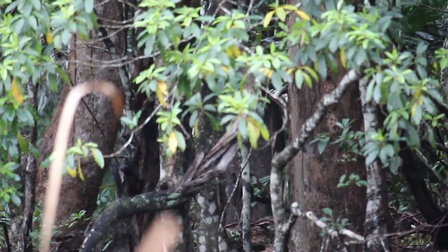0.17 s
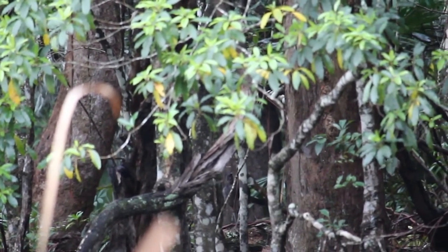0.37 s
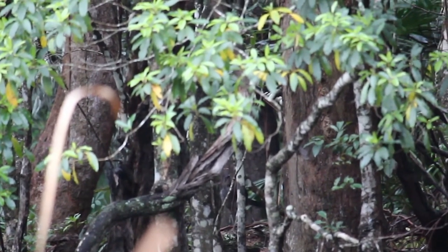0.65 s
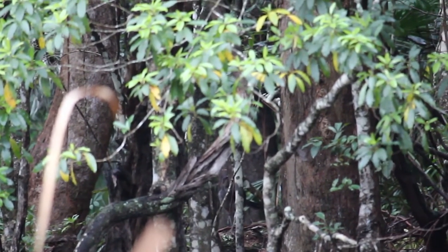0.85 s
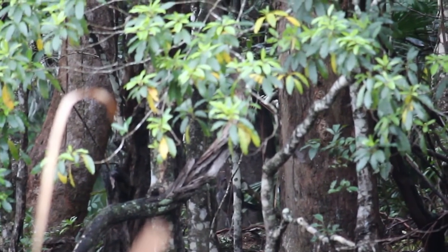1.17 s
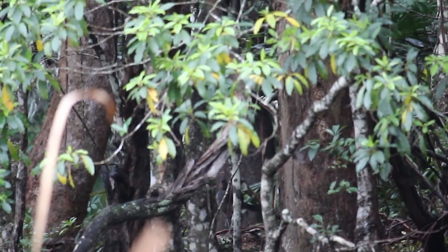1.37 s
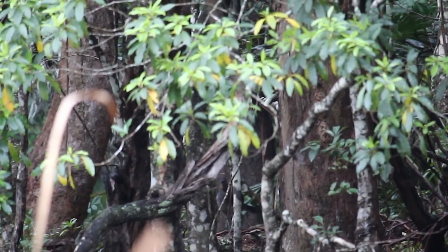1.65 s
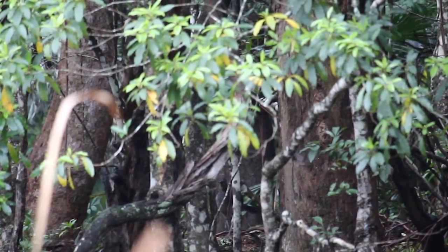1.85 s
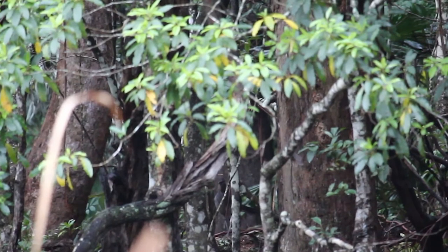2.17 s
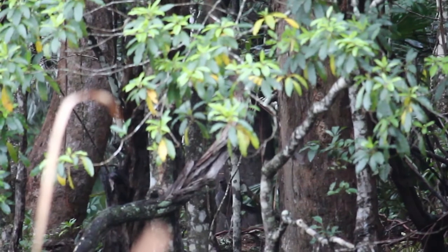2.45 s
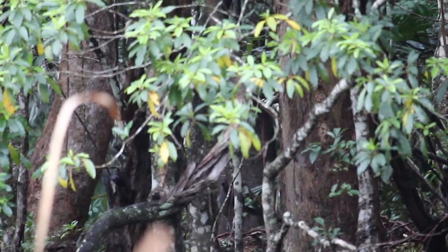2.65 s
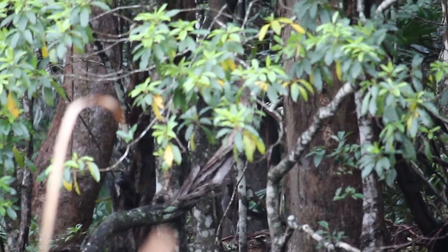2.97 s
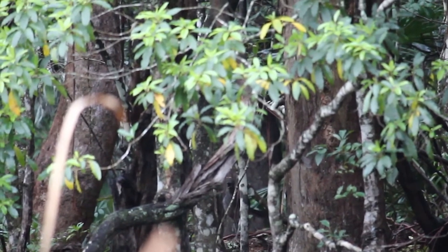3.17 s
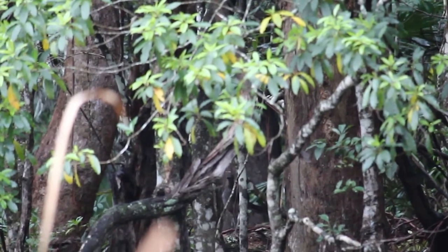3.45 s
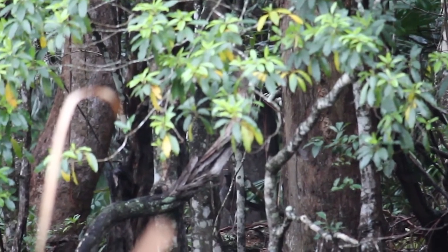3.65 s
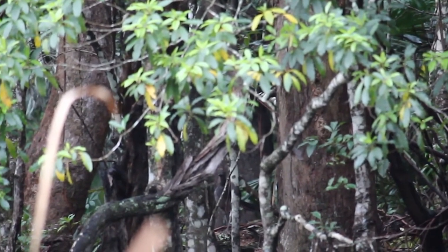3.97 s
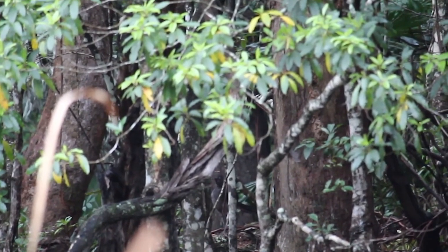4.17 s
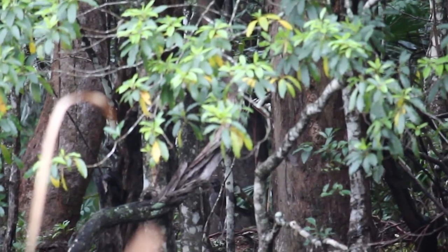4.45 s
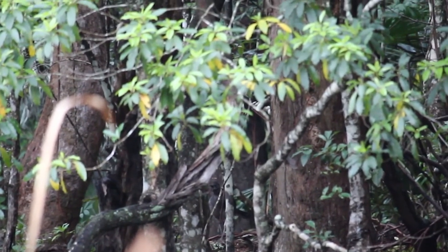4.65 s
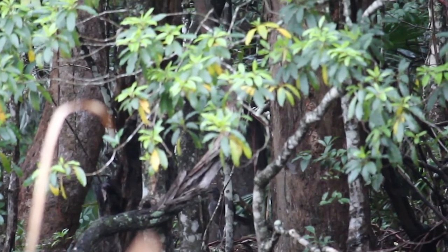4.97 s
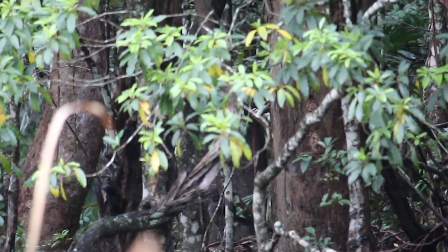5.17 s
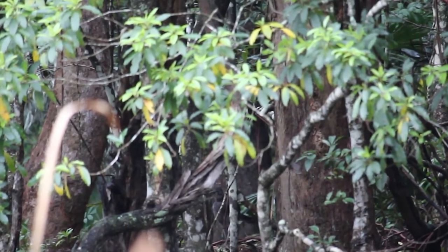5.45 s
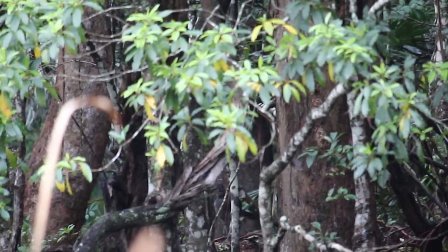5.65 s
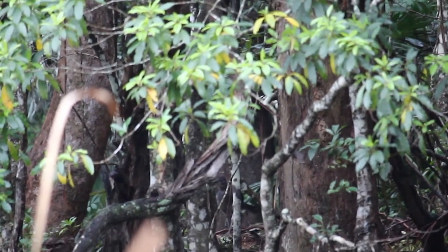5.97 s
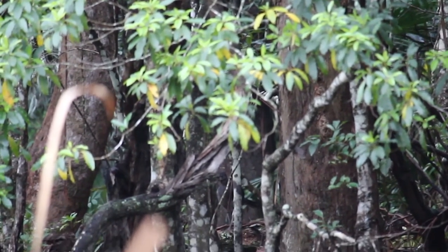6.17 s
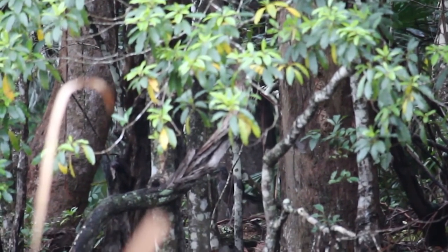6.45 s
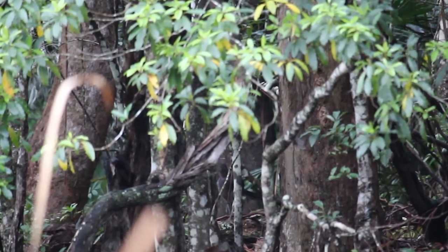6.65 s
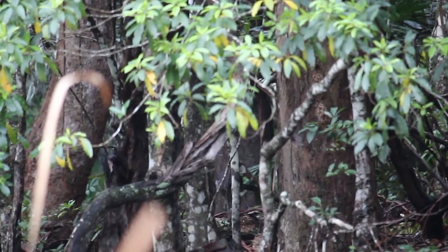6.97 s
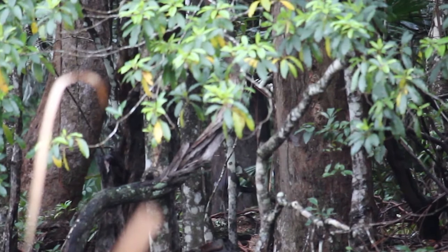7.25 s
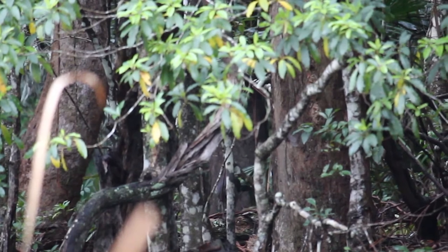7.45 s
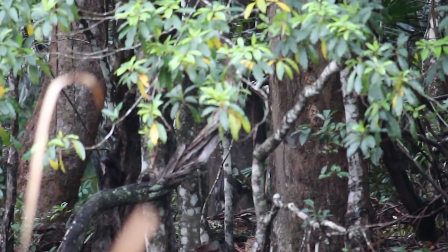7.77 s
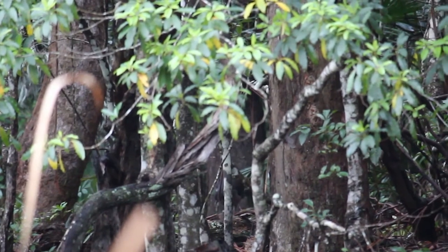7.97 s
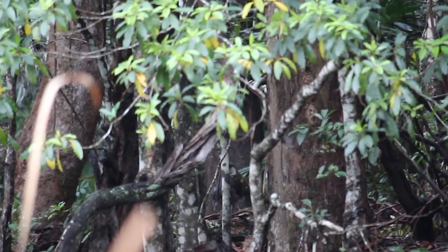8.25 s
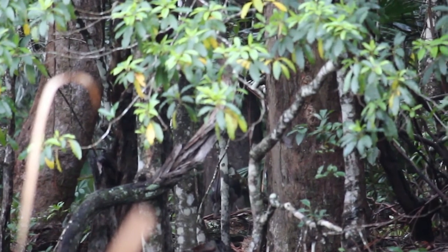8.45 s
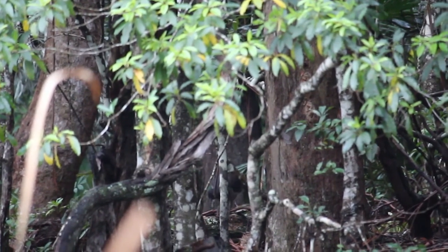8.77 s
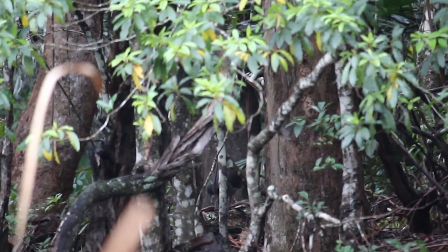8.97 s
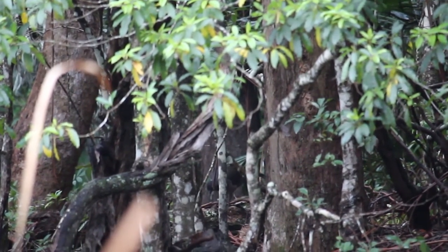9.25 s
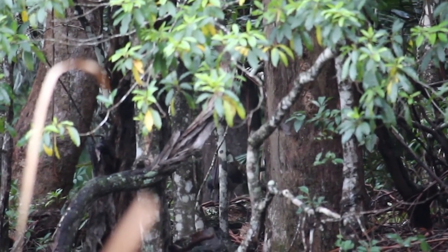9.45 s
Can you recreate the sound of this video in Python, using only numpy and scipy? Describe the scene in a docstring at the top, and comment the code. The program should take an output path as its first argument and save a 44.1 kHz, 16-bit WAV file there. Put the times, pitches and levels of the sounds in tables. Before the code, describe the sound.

A steady soft wash of wet-forest air with a faint low drone and scattered drips runs throughout. At 0-0.65 s a lyrebird gives short, quiet dry rasps; a drip thuds at 0.5, the camera creaks in tiny slips at 0.9, a drop ticks at 1.3, and small birds pip at 0.9 and 1.5. Whip whistles near 2.0, 2.7 and 3.3 s swell around 2.3 kHz, then snap above 3 kHz, with slurs and hoarse snarls at 2.5 and 3.3. A yelp breaks downward at 3.5-3.7. A long rasp surges from 4.3 to 5.0; a rattling squawk comes at 5.4-5.9, then quick upward chirps and a final whip at 6.3. Forest echoes trail away. After 7 s: faint hisses, weak low rasps, a chirp at 7.9, a breathy snarl at 8.2, light low wind, soft bumps at 8.7-9.2, sharp drips at 8.6 and 9.2-9.3, and a tiny falling whistle at 9.4.

```python
"""Lyrebird in a wet forest

A lyrebird sings whip whistles that swoop up and break, slurs, a yelp that breaks downward, snarls and dry rasps.
Tones are sine stacks with wavering pitch; rasps are puffs of noise through throat resonances, plus single pulses.
Small birds pip as single sines; drips, a camera creak and late soft bumps are struck resonances.
Scattered noise taps stretch the calls into a forest tail, over filtered-noise air, a faint drone and light wind."""
import sys
import numpy as np
from scipy import signal
from scipy.fft import rfft, irfft
from scipy.io import wavfile
from scipy.ndimage import uniform_filter1d, map_coordinates

SR = 44100
rng = np.random.default_rng(int(sys.argv[2]) if len(sys.argv) > 2 else 0)


def transcribe(u):
    """Save the signal u as a 16-bit wav file named by the first command-line argument.

    u: samples, shape (n,) or (channels, n), limited to [-1, 1]; the rate is SR.
    q: integer samples, one column per channel.
    """
    v = np.clip(np.atleast_2d(u).T, -1, 1)
    q = np.round(v * 32767).astype(np.int16)
    wavfile.write(sys.argv[1], SR, q)


N = 423360
EDGE_HZ = 15750  # top of the band

# Wash of the forest, common part and left-right difference: (frequency [Hz], relative density [dB])
AIR_MID_COLOUR = [(20, -43), (40, 4), (174, 0), (670, -7.5), (880, -5.5), (1600, -9.5), (3140, -8),
                  (4920, -13.5), (15500, -28.5)]
AIR_SIDE_COLOUR = [(35, -13.5), (179, -7.5), (1190, -13), (7160, -21.5), (15500, -36)]
AIR_MID_DB, AIR_SIDE_DB = -51.5, -52

# Far tail among the trunks: (frequency [Hz], decay by 60 dB [s])
FOREST_DECAY = [(300, 8.9), (1000, 1.33), (2500, 1.33), (4000, 1.62), (7000, 0.77), (14000, 0.31)]

# Short rasps: (start [s], length [s], crest as share of length, crest effort [dB], flutter setting [Hz],
# mouth factor on resonances, slack factor on widths, chest boost [dB], brightness [dB])
SHORT_RASPS = [ (0, .13, 0.26, -51, 120, 1.06, 1.4, -12, 8.5),
               (0.132, 0.073, 0.65, -49.5, 120, 1.08, 1.46, -0.5, 6.5),
               (0.358, 0.14, 0.84, -55, 92, 1.03, 1.23, -2.5, 16),
               (0.588, 0.053, 0.69, -49, 89, 1.12, 1.74, -7.5, 12),
               (5.414, 0.25, 0.35, -40, 34, 1.053, 0.87, 1, -4),
               (5.62, 0.29, 0.49, -55.5, 42, 0.89, 0.85, 27.5, -19.5),
               (5.913, 0.14, 1, -56.5, 53, 1.33, 1.66, 13.5, 7),
               (7.43, 0.26, 0.44, -67, 37, 0.68, 1.84, 28.5, -9),
               (7.77, 0.16, 0.88, -58, 36, 0.98, 2, 27, -10), ]
# Throat before those factors: (resonance [Hz], pole width [Hz], level [dB],
# share of the chest boost, share of the brightness)
RASP_THROAT = [(880, 480, -7, 0.93, 0.46), (1715, 227, 1.5, 0.26, 0.25), (2180, 780, -1.5, 0.35, 0.58),
               (2755, 1370, -2, 0.63, 1), (4050, 1530, -6, 0.42, 0.54)]
RASP_RISE_DB, RASP_SINK_DB = 4.5, 7  # how far below its crest a rasp starts and ends
MOUTH_SHUT_PER_DB = .016  # share by which the resonances drop as the effort sinks
RASP_TOP_HZ = 8200  # the throat dulls the puffs above this
RASP_ATTACK_S, RASP_RELEASE_S = 0.0063, 0.025

# Near drops: (time [s], tick peak [dB], ring [Hz], pole width [Hz], thud relative to tick [dB])
NEAR_DRIPS = [(0.513, -52.5, 400, 206, 15), (1.271, -27.5, 2000, 880, -9.5), (8.58, -37, 9200, 8180, -18),
              (9.2265, -27, 2150, 1350, -21), (9.295, -31.5, 5000, 7900, -14)]

# Slips of the camera creak: (time [s], ring peak [dB])
CREAK_SLIPS = [(0.8786, -32), (0.884, -32.5), (0.8958, -36), (.914, -35), (0.931, -35.5)]

# Small birds' notes: (start [s], length [s], from [Hz], to [Hz], relative level [dB], pitch buzz [Hz rms])
PIP_NOTES = [(0.89, 0.049, 7070, 7010, -56, 60), (1.467, 0.032, 6590, 7280, -50, 130),
             (7.149, 0.11, 7960, 7460, -65, 366), (8.7, 0.033, 4800, 5800, -65, 248),
             (9.16, 0.0252, 5000, 5480, -60.5, 420)]
PIP_ATTACK_S, PIP_RELEASE_S = 0.0099, 0.0044
# A small bird's note that lifts, then falls: (time [s], pitch [Hz], relative level [dB])
FALLING_WHISTLE = [(9.426, 4840, -50), (9.442, 5060, -55.5), (9.462, 4220, -51), (9.494, 3700, -54.5)]

# Whip whistles: (start [s], break [s], end [s], first pitch [Hz], held pitch [Hz], break pitch [Hz],
# landing pitch [Hz], top pitch [Hz], flick rise [Hz], swoop time [s], climb time [s],
# level reached at the break [dB], swell of the low note [dB], level above the break [dB], overtone level [dB])
WHIP_NOTES = [ (2.013, 2.168, 2.28, 2000, 2366, 2774, 3100, 3380, 520, 0.015, 0.021, -23, 22, -27, -37),
              (2.683, 2.734, 2.838, 2450, 2523, 2785, 3040, 3784, 9.2, 0.0146, .036, -30, 8, -28.5, -39.5),
              (3.257, 3.412, 3.464, 2380, 2287, 2754, 2856, 3592, 70, .034, .018, -20, 34, -24, -36),
              (6.269, 6.471, 6.53, 1700, 2192, 2650, 3100, 3720, 178, 0.048, 0.023, -28.5, 21.5, -28.5, -41),
              ]
WHIP_ATTACK_S, WHIP_RELEASE_S = 0.022, 0.016
SETTLE_S, SWELL_S = .03, 0.076  # how fast the first pitch settles; how long before the break the low note surges
FLICK_S = 0.032
# Throat's weighting of whistle overtones: (frequency [Hz], gain [dB])
OVERTONE_COLOUR = [(2200, 10), (4500, 5), (5800, -8), (7000, 0), (8200, -15), (10000, -16), (15000, -42)]

# Hoarse snarls: (start [s], length [s], final level [dB], swell [dB])
SNARL_CALLS = [(2.47, .18, -39.5, 9), (3.29, .21, -33.5, 4), (8.22, 0.31, -42.5, 11)]
# Throat of the snarls: (frequency [Hz], relative gain [dB])
SNARL_COLOUR = [(700, -23.5), (1050, -2.5), (1700, -3.5), (2100, 0), (2600, 2.5), (3300, -4), (4400, -13),
                (6000, -28), (12000, -55)]

# Short slurs: (start [s], length [s], from [Hz], to [Hz], slide time [s], starting level [dB],
# overtones relative to that level [dB])
SLUR_NOTES = [(2.576, 0.032, 2340, 2250, .02, -41.5, -13), (2.61, 0.044, 2204, 2420, .025, -35.5, -20),
              (3.213, .096, 2180, 3000, 0.042, -43.5, -29), (3.261, 0.16, 2260, 1900, .035, -35, -28),
              (5.904, .026, 900, 1230, .005, -38, -17), (5.954, .04, 1150, 3170, .0055, -40.5, -20),
              (6.01, .04, 1000, 3320, .0036, -36, -22), (7.903, 0.043, 1180, 3340, .0053, -48.5, -17)]
SLUR_FADE_DB_PER_S = 34
SLUR_ATTACK_SHARE, SLUR_RELEASE_S = 0.17, 0.026  # the attack takes this share of the slide time

# Registers of the yelp: (start [s], length [s], from [Hz], to [Hz], power of the pitch bend,
# share of half-pitch lines)
YELP_REGISTERS = [(3.455, 0.086, 1112, 1451, 2.16, .02), (3.5414, 0.0467, 1008, 1033, 0.44, .007),
                  (3.584, 0.12, 645.3, 605, 1.21, 0.63)]
# Yelp effort and its moving resonance: (time [s], level [dB], resonance [Hz], boost [dB])
YELP_EFFORT = [(3.47, -47, 1150, 6), (3.529, -28.5, 2680, 2), (3.538, -33, 2850, -2),
               (3.545, -23.5, 2000, 25), (3.553, -37.5, 2980, -1), (3.602, -28.5, 1930, 11),
               (3.635, -32, 2280, 2), (3.705, -28.5, 2420, 12)]
# Fixed throat of the yelp: (frequency [Hz], relative gain [dB])
YELP_COLOUR = [(600, -20), (1000, -5), (1600, -5), (2000, -2.5), (3150, -1.5), (3900, -10), (4700, -21),
               (12000, -46)]
YELP_ATTACK_S, YELP_RELEASE_S = 0.0025, 0.0026

# Long rasp: (time [s], effort [dB])
LONG_RASP_EFFORT = [(4.295, -56), (4.385, -37), (4.455, -36), (4.48, -40.5), (4.555, -40.5), (4.69, -34),
                    (4.77, -37.5), (4.88, -35), (4.94, -36), (4.965, -50)]
# Its tighter throat: (resonance [Hz], pole width [Hz], level [dB])
LONG_RASP_THROAT = [(900, 270, -6), (1767, 103, 0.5), (2240, 1000, 3.5), (4000, 1370, -1),
                    (7440, 650, -15.5)]
LONG_PUFFS_DB, LONG_CORE_DB = -1.8, 2.5  # puffs and pulsing core, relative to the effort

# Single hard pulses of the syrinx, in the long rasp and then in the squawk: (time [s], peak [dB])
SYRINX_PULSES = [(4.335, -33), (4.36, -32), (4.3772, -29), (4.4191, -27), (4.4314, -28), (4.4535, -31),
                 (4.4847, -29), (4.7014, -28), (4.7455, -28), (4.8661, -29.5), (4.904, -29),
                 (5.4193, -30.5), (5.4866, -27.5), (5.4994, -25), (5.5184, -23.5), (5.5412, -24.5),
                 (5.5659, -24.5)]

# Thin hisses and faint, blurred calls, among them a breathy lyrebird note at 8.19 s:
# (start [s], length [s], centre [Hz], pole width [Hz], relative level [dB])
HISS_BANDS = [(6.95, 0.66, 3130, 500, -67), (8.19, 0.15, 2650, 250, -58.5), (9.362, 0.26, 7060, 1500, -67)]

# Soft bumps on the camera, before the channel gains: (time [s], peak [dB])
CAMERA_BUMPS = [(8.687, -35), (9.01, -33.5), (9.103, -38.5), (9.18, -36)]


def amp(db):
    """Decibels to gain."""
    return 10 ** (np.asarray(db) / 20)


def evened(x):
    """Scales to rms 1."""
    return x / np.sqrt(np.mean(x ** 2) + 1e-20)


def read(points, hz):
    """Reads a table on a log-frequency axis."""
    f, value = np.transpose(points)
    return np.interp(np.log(hz + 1), np.log(f + 1), value)


def curves(rows):
    """Start time and each column at audio rate."""
    s, *columns = np.transpose(rows)
    t = np.arange(s[0], s[-1], 1 / SR)
    return s[0], [np.interp(t, s, c) for c in columns]


def times(length):
    """The time axis of a note."""
    return np.arange(0, length, 1 / SR)


def envelope(t, attack, release):
    """Attack, hold and release, as a gain."""
    return np.clip(np.minimum(t / attack, (t[-1] - t) / release), 0, 1)


def faded(x, size=130):
    """Softens both ends over a number of samples."""
    n = np.arange(len(x))
    return x * np.minimum(np.minimum(n, n[::-1]) / size, 1)


def add(mix, s, sound):
    """Mixes a sound in at time s."""
    part = mix[max(round(s * SR), 0):][:len(sound)]
    part += sound[:len(part)]


def waver(size, hz):
    """Smooth chance of rms about 1, drawn from hz random points a second."""
    points = rng.standard_normal(4000)
    return map_coordinates(points, [np.arange(size) * hz / SR], order=3, mode="mirror")


def resonate(x, hz, width):
    """A steep resonance that can follow a pitch curve: two equal damped poles in a row."""
    turn = np.exp(2j * np.pi * np.cumsum(hz * np.ones(len(x))) / SR)
    r = np.exp(-np.pi * width / SR)
    ring = (turn * signal.lfilter([1], np.poly([r, r]), x / turn + 1e-18)).real
    # A high-pass just above the mean pitch thins the bass
    return signal.sosfilt(signal.butter(2, np.mean(hz) * 1.06, "high", fs=SR, output="sos"), ring)


def knock(hz, width, size=6000):
    """One blow on a resonance, peak 1."""
    ring = resonate(signal.unit_impulse(size), hz, width)
    return ring / abs(ring).max()


def forest(x, near_db, far_db, near_t60=0.24, alike=0.63):
    """Direct sound, dense scatter from nearby trunks, and a long tail from the far ones."""
    size = 2 * SR
    taps = rng.standard_normal((2, size)) * (rng.random(size) < 5000 / SR)  # about 5000 echoes a second
    apart = np.sqrt((1 - np.clip(alike, 0, 1)) / (1 + alike))
    taps = np.array([taps[0] + apart * taps[1], taps[0] - apart * taps[1]])
    hz, t, z = signal.stft(taps, SR, nperseg=256)
    far_t60 = read(FOREST_DECAY, hz)[:, None]
    near_power = amp(near_db - 60 * t / near_t60) ** 2 / near_t60
    far_power = amp(far_db - 60 * t / far_t60) ** 2 / far_t60
    gain = np.sqrt((near_power + far_power) * np.log(10 ** 6) / SR)
    onset = np.minimum(t / 0.0017, 1)
    tail = signal.istft(z * gain * onset, SR, nperseg=256)[1] / taps.std()
    return x + signal.fftconvolve(x[None], tail, axes=1)[:, :N]


def sing(hz, db):
    """Phase and level of one trembling note."""
    hz = hz * (1 + .003 * waver(len(hz), 300))
    return 2 * np.pi * np.cumsum(hz) / SR, db + waver(len(hz), 163.0)


def whistle(hz, db, reedy_db, smear=0.2, follow=0.48, rough_db=3):
    """Soft notes are reedy and loud ones nearly pure: the overtones grow less than the fundamental."""
    phase, db = sing(hz, db)
    shaken = phase + smear * waver(len(hz), 600)  # uneven cycles blur the overtones
    upper = sum(amp(read(OVERTONE_COLOUR, k * hz)) * (k * hz < EDGE_HZ) * np.sin(k * shaken)
                for k in range(2, 6))
    over_db = reedy_db + follow * (db - db.max()) + rough_db * waver(len(hz), 189.8)
    return np.sqrt(2) * (amp(db) * np.sin(phase) + amp(over_db) * upper)


def rasp(db, rate, throat, unevenness=0.27, closing=0.87, leak=0.46, flutter_db=2.0):
    """The syrinx flutters unevenly; each opening sends a puff through the throat resonances."""
    # Openings come on average 1.5 times as often as the flutter setting
    turns = np.cumsum(rate * (1.5 + unevenness * waver(len(db), rate))) / SR
    gate = (leak + np.exp(-(turns % 1) / closing)) * amp(flutter_db * waver(len(db), rate))
    puffs = gate * rng.standard_normal(N)[:len(db)]
    voice = sum(amp(level) * evened(resonate(puffs, hz, width)) for hz, width, level in throat)
    dulled = signal.sosfilt(signal.butter(2, RASP_TOP_HZ, fs=SR, output="sos"), voice)
    return dulled * amp(db) * envelope(np.arange(len(db)) / SR, RASP_ATTACK_S, RASP_RELEASE_S)


def pulse(s, db, hz, length=0.013):
    """One slow opening of the syrinx lets out a few wobbling cycles of throat tone: start time and sound."""
    size = int(length * SR)
    wobbling_hz = hz * (1 + .02 * rng.standard_normal() + .055 * waver(size, 680))
    phase = 2 * np.pi * np.cumsum(wobbling_hz) / SR
    opening = np.sin(np.pi * np.linspace(0, 1, size) ** .5) ** 2
    return s, amp(db) * opening * np.sin(phase)


def air():
    """The steady wash of the wet forest: coloured noise, swaying slightly, with a separate stereo difference."""
    hz = np.fft.rfftfreq(N, 1 / SR)
    mid, side = (evened(irfft(rfft(rng.standard_normal(N)) * amp(read(colour, hz)), N))
                 for colour in (AIR_MID_COLOUR, AIR_SIDE_COLOUR))
    mid = mid * amp(AIR_MID_DB + .5 * waver(N, 7.8))
    side = side * amp(AIR_SIDE_DB + .5 * waver(N, 4.28))
    return np.array([mid + side, mid - side])


def drone(hz=134, width=22, db=-62.0):
    """A faint far drone: noise ringing in a narrow low resonance."""
    return amp(db) * evened(resonate(rng.standard_normal(N), hz, width))


def wind(hz=46, width=76, db=-53):
    """Light low wind that rises late, stronger on the right and in opposite polarity on the left."""
    gust = amp(db) * evened(resonate(rng.standard_normal(N), hz, width))
    rise = np.interp(np.arange(N) / SR, [7.4, 8.1], [.15, 1])
    return rise * gust * np.array([[-.5], [1]])


def rasps():
    """Short rasps each follow one arch of effort; the resonances rise and fall with it."""
    out = np.zeros(N)
    for start, length, crest, db, rate, mouth, slack, chest_db, bright_db in SHORT_RASPS:
        past = times(length) / length - np.clip(crest, .05, .95)
        rise = RASP_RISE_DB * (past / past[0]) ** 2
        sink = RASP_SINK_DB * (past / past[-1]) ** 2
        sag = np.where(past < 0, rise, sink)
        opening = mouth * (1 - MOUTH_SHUT_PER_DB * sag)
        throat = [(hz * opening, width * slack, level + chest * chest_db + bright * bright_db)
                  for hz, width, level, chest, bright in RASP_THROAT]
        add(out, start, rasp(db - sag, rate, throat))
    return out


def drips(thud_hz=240, thud_width=130, patter_db=-53):
    """Near drops tick and thud; many fainter ones patter on leaves to either side."""
    near, patter = np.zeros(N), np.zeros((2, N))
    for s, db, hz, width, thud_db in NEAR_DRIPS:
        add(near, s, amp(db) * (knock(hz, width) + amp(thud_db) * knock(thud_hz, thud_width)))
    for when, side, pitch, weight in rng.random(size=(90, 4)):
        drop = knock(1500 + 6000 * pitch, 3000)
        add(patter[int(side * 2)], when * N / SR, amp(patter_db + 7.9 * weight ** 3) * drop)
    return forest(near, -8.5, -37) + patter + .4 * patter[::-1]


def creak(hz=680, width=520):
    """The camera body creaks in a few slips, each ringing the body with a softer low knock."""
    out = np.zeros(N)
    for s, db in CREAK_SLIPS:
        add(out, s, amp(db) * (knock(hz, width) + amp(-12.5) * knock(173, 150)))
    return out


def pips(buzz_rate=450):
    """The small birds' notes are single tones; fast random swings of pitch make them fuzzy."""
    out = np.zeros(N)
    for start, length, from_hz, to_hz, db, swing_hz in PIP_NOTES:
        t = times(length)
        glide = from_hz + (to_hz - from_hz) * t / length
        phase, level = sing(glide + swing_hz * waver(len(t), buzz_rate), db)
        add(out, start, envelope(t, PIP_ATTACK_S, PIP_RELEASE_S) * amp(level) * np.sin(phase))
    start, (hz, db) = curves(FALLING_WHISTLE)
    phase, level = sing(hz, db)
    add(out, start, faded(amp(level) * np.sin(phase)))
    return np.sqrt(2) * out


def whips():
    """A held note swells and swoops up to the break; above it the pitch climbs, levels off and flicks up."""
    out = np.zeros(N)
    for (start, snap, end, first_hz, held_hz, break_hz, landing_hz, top_hz, flick_hz,
         swoop, climb, low_db, swell_db, high_db, reedy_db) in WHIP_NOTES:
        t = times(end - start)
        away, below = abs(start + t - snap), start + t < snap
        settling = (first_hz - held_hz) * np.exp(-t / SETTLE_S)
        low = held_hz + settling + (break_hz - held_hz) * np.exp(-(away / swoop) ** 2)
        flick = flick_hz * np.exp(-((t[-1] - t) / FLICK_S) ** 2)
        high = top_hz + (landing_hz - top_hz) * np.exp(-away / climb) + flick
        db = np.where(below, low_db - swell_db * (1 - np.exp(-away / SWELL_S)), high_db)
        # Round off the jump in pitch and level over 90 samples
        hz, db = uniform_filter1d(np.array([np.where(below, low, high), db]), size=90)
        add(out, start, envelope(t, WHIP_ATTACK_S, WHIP_RELEASE_S) * whistle(hz, db, reedy_db))
    return out


def snarls(flutter_db=1.9, flutter_rate=130):
    """Broad, hoarse hisses swell with a fast flutter and stop short."""
    colour = amp(read(SNARL_COLOUR, np.fft.rfftfreq(N, 1 / SR)))
    rush = evened(irfft(rfft(rng.standard_normal(N)) * colour, N))
    rush = rush * amp(flutter_db * waver(N, flutter_rate))
    effort = np.zeros(N)
    for start, length, db, swell_db in SNARL_CALLS:
        t = times(length)
        swell = amp(db - swell_db * (1 - t / length) ** 2)
        add(effort, start, swell * envelope(t, RASP_ATTACK_S, RASP_RELEASE_S))
    return effort * rush


def slurs():
    """Slides that level off and fade; the quicker the slide, the harder its attack."""
    out = np.zeros(N)
    for start, length, from_hz, to_hz, slide, db, over_db in SLUR_NOTES:
        t = times(length)
        hz = to_hz + (from_hz - to_hz) * np.exp(-t / slide)
        note = whistle(hz, db - SLUR_FADE_DB_PER_S * t, db + over_db)
        add(out, start, envelope(t, SLUR_ATTACK_SHARE * slide, SLUR_RELEASE_S) * note)
    return out


def yelp(jitter=0.0037, focus_width_hz=260):
    """A harmonic stack in a shifting throat; alternating strong and weak cycles add lines halfway between."""
    out = np.zeros(N)
    k = np.arange(2, 30)[:, None] / 2  # harmonic numbers in half steps
    s, *controls = np.transpose(YELP_EFFORT)
    for start, length, from_hz, to_hz, bend, half in YELP_REGISTERS:
        t = times(length)
        db, focus_hz, focus_db = (np.interp(start + t, s, c) for c in controls)
        hz = from_hz + (to_hz - from_hz) * (t / length) ** bend
        phase = 2 * np.pi * np.cumsum(hz * (1 + jitter * waver(len(t), 402))) / SR
        focus = np.exp(-((k * hz - focus_hz) / focus_width_hz) ** 2)
        throat = amp(read(YELP_COLOUR, k * hz) + focus_db * focus)
        line_share = np.where(k % 1, half * np.minimum(k / 2.0, 1) ** 3, 1)
        size = throat * line_share * (k * hz < EDGE_HZ)
        lines = size * np.sin(k * phase + rng.uniform(0, 2 * np.pi, k.shape))
        tone = lines.sum(0) / np.sqrt((size ** 2).sum(0) / 2)  # the effort alone sets the level
        add(out, start, amp(db) * envelope(t, YELP_ATTACK_S, YELP_RELEASE_S) * tone)
    return out


def long_rasp(core_hz=1740, stray_s=0.0035, spread_db=2, count=40):
    """The long rasp surges several times: fluttering puffs around a core of uneven throat pulses."""
    out = np.zeros(N)
    start, (effort,) = curves(LONG_RASP_EFFORT)
    add(out, start, rasp(effort + LONG_PUFFS_DB, rate=55, throat=LONG_RASP_THROAT, closing=0.88, leak=0.34))
    spots = np.linspace(0, len(effort) - 1, count).astype(int)
    for at, (late, force) in zip(spots, rng.standard_normal((count, 2))):
        db = effort[at] + LONG_CORE_DB + spread_db * force
        add(out, *pulse(start + at / SR + stray_s * late, db, core_hz))
    return out


def hard_pulses(hz=1670):
    """The pulses that stand out of the long rasp and make the squawk rattle."""
    out = np.zeros(N)
    for s, db in SYRINX_PULSES:
        add(out, *pulse(s, db, hz))
    return out


def hisses():
    """Each hiss is a narrow band of noise that swells and dies."""
    out = np.zeros(N)
    for start, length, hz, width_hz, db in HISS_BANDS:
        swell = np.hanning(int(length * SR))
        band = evened(resonate(rng.standard_normal(N)[:len(swell)], hz, width_hz))
        add(out, start, amp(db) * swell * band)
    return out


def bumps(hz=65, width=45):
    """Soft low thumps push the two ports in opposite ways, harder on the right."""
    out = np.zeros(N)
    for s, db in CAMERA_BUMPS:
        add(out, s, amp(db) * knock(hz, width))
    return out * np.array([[-.5], [2.]])


def scene():
    """The lyrebird nearly central, slightly louder on the left; small birds farther off, drips and camera close."""
    whistles = amp(-3.5) * forest(whips(), near_db=-2, far_db=4.0)
    slides = forest(slurs(), near_db=-8, far_db=-1.0)
    yelps = forest(yelp(), near_db=-12, far_db=-1)
    harsh = amp(-3.5) * forest(rasps(), near_db=-4.5, far_db=1.5)
    rattle = forest(hard_pulses(), near_db=-7, far_db=-10)
    hoarse = forest(snarls(), near_db=-4.5, far_db=0)
    drawn_out = forest(amp(-5) * long_rasp(), near_db=-10.5, far_db=0.5)
    lyrebird = whistles + slides + yelps + harsh + rattle + hoarse + drawn_out
    lyrebird = lyrebird * amp([[.8], [-.8]])  # left and right gain in dB
    farther_calls = amp(10.5) * forest(pips() + hisses(), near_db=-8, far_db=-0.5, alike=0.38)
    return lyrebird + farther_calls + drips() + creak() + bumps() + air() + drone() + wind()


def record(dry):
    """The recorder's band limit."""
    low_pass = signal.firwin(1023, EDGE_HZ, window=("kaiser", 9), fs=SR)
    return signal.oaconvolve(dry, low_pass[None], "same")


dry = scene()
out = record(dry)
transcribe(out)
```